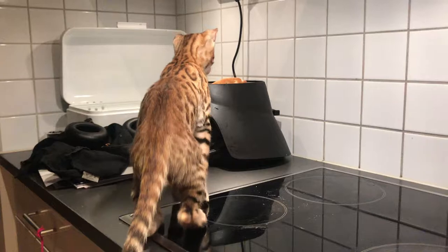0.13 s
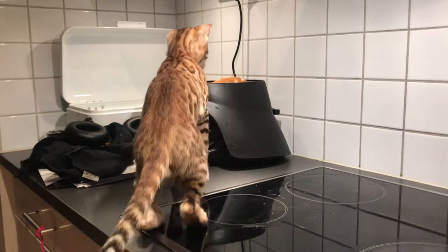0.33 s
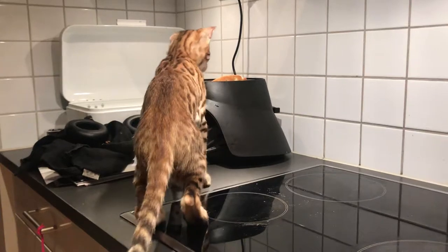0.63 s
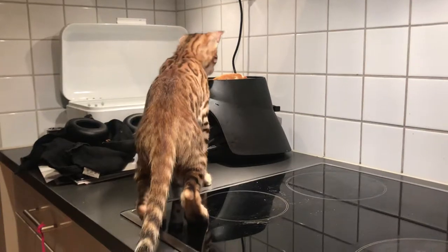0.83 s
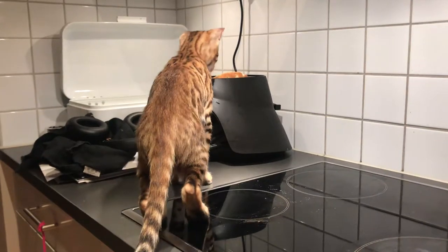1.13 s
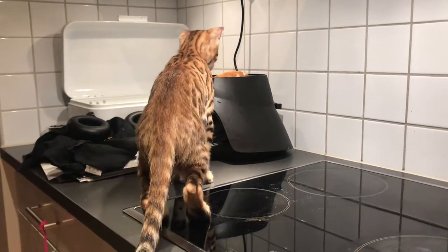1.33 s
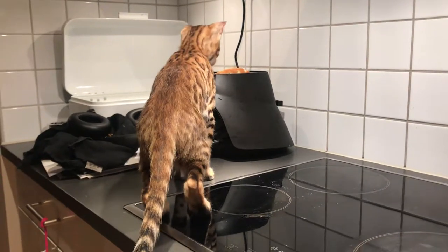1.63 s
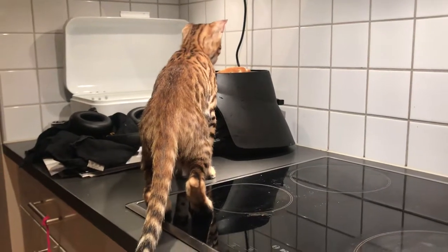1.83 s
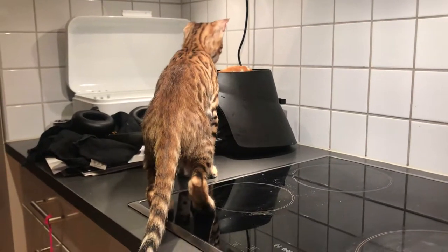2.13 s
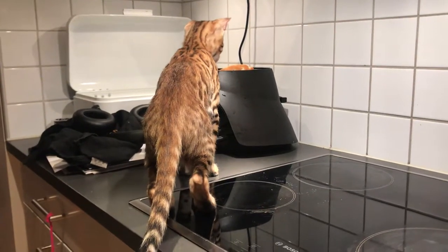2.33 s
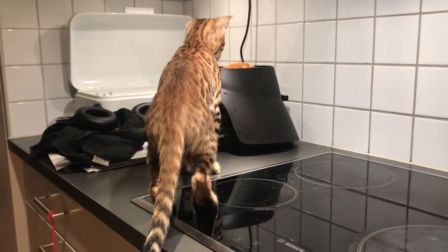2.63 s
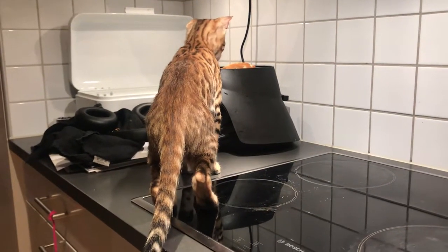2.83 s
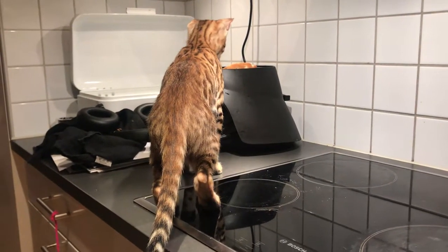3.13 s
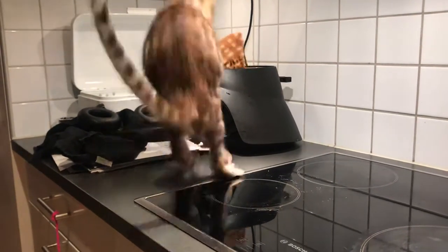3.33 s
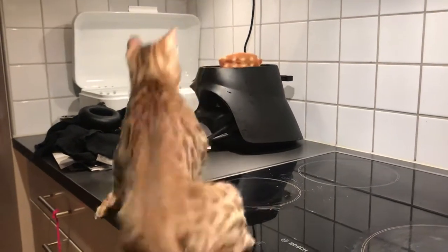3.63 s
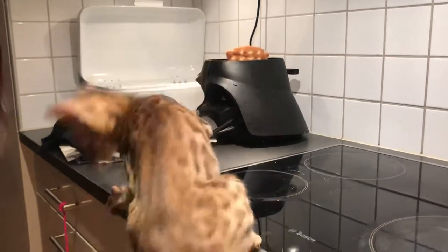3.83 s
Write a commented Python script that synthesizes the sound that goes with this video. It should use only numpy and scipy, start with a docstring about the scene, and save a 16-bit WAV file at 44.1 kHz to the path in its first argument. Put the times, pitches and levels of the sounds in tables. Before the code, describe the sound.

In a small tiled kitchen, low hum and soft hiss precede a sudden metallic toaster clack with bounces and rattle, then hollow knocks, low thumps and clicking claws, picked up by one nearby microphone.

```python
"""After a moment of silence a tiled kitchen hums under a steady hiss: shaped noise with a few thin steady
tones. Faint ticks come first, made like the later blows: a burst of noise plus the ringing of what is hit. Then
a toaster releases: latch, carriage clack, bounces, ringing sheet metal and a rattle of tiny clicks. A startled
cat lands with low thumps, knocks something hollow, slips on the glass hob (dense tiny contacts) and scrabbles
away on its claws. The tiled walls answer with a short echoing tail."""
import sys
import numpy as np
from scipy import signal
from scipy.io import wavfile
from scipy.ndimage import uniform_filter1d

SR = 44100
rng = np.random.default_rng(int(sys.argv[2]) if len(sys.argv) > 2 else 0)


def rack_gain(trim_db):
    """Turn a fader trim in dB into the linear factor to multiply a signal by."""
    fader = np.asarray(trim_db, float)
    return 10 ** (fader / 20)


def unload_audio(sound):
    """Save the sound as a 16-bit wav file, at the path given as the first command line argument."""
    columns = np.transpose(np.atleast_2d(sound))
    # keep every value between -1 and 1, then stretch to whole-number steps
    steps = np.round(np.clip(columns, -1, 1) * 32767)
    wavfile.write(sys.argv[1], SR, steps.astype(np.int16))


N = 176400  # samples: 4 s

# blows of the toaster carriage: (time [s], level [dB], chatter length [s], tilt [dB per octave],
# lifted band [Hz])
BLOWS = [(3.309, -24, 0.0089, -7, 3000), (3.3125, -14.5, 0.0059, 0.5, 1080), (3.3185, -19, 0.0053, -4, 684),
         (3.3255, -9, 0.0045, 5, 12000), (3.3285, -9, 0.003, 0.5, 3930), (3.3315, -4, 0.0037, 2.1, 9200),
         (3.342, -12, 0.0073, 3, 4470), (3.354, -25.5, .006, -1, 4500), (3.378, -15.5, 0.0025, -1.5, 4500),
         (3.386, -13.5, 0.0067, 3.5, 4970), (3.408, -28, .006, -2, 4500), (3.421, -18.5, 0.0047, 4, 4400),
         (3.430, -15, 0.0054, -1.5, 980), (3.452, -32, 0.0043, -14, 895)]
# tone of the sheet-metal shell: (frequency [Hz], relative level [dB])
SHELL_TONE = [(88, -7.5), (150, 2.5), (254, -4), (315, 3), (466, -4), (888, -0.5), (1870, -8), (4410, -4.5),
              (4760, -9), (11700, -16.5), (16000, -26.5)]
RISE_SHARE = 0.3  # rise time of a hit as a share of its chatter length


def evened(x):
    """Scales a signal to an average strength (rms) of 1."""
    return x / np.sqrt(np.mean(x ** 2) + 1e-20)


def read(points, hz):
    """Reads a table between its points, on a logarithmic frequency scale."""
    f, value = np.transpose(points)
    return np.interp(np.log(hz + 1), np.log(f + 1), value)


def add(mix, s, sound):
    """Adds a sound into the mix at s seconds, cut off at the end of the mix."""
    part = mix[round(s * SR):][:len(sound)]
    part += sound[:len(part)]


def colour(points, tilt_db=0, focus_hz=None):
    """A filter with the given spectrum and energy 1 that never sounds before its input."""
    focus_db, focus_octaves = 6.5, 0.13  # where a hit lands lifts one band
    hz = abs(np.fft.fftfreq(2048, 1 / SR))
    db = read(points, hz) + tilt_db * np.log2((hz + 100) / 3000)
    if focus_hz:
        octaves_away = np.log2((hz + 1) / focus_hz)
        db = db + focus_db * np.exp(-0.5 * (octaves_away / focus_octaves) ** 2)
    log_gain = np.log(rack_gain(np.maximum(db, -100)))
    # this phase packs the energy as early as possible
    spectrum = np.exp(np.conj(signal.hilbert(log_gain)))
    taps = np.fft.ifft(spectrum).real[:1024]
    return taps / np.linalg.norm(taps)


def ring(modes, longest_s, shifts, rise_s):
    """A struck body rings as a sum of dying sine tones (modes), scaled to energy 1 before the soft rise."""
    detune = 0.0008  # each hit shifts the modes by about this share
    t = np.arange(SR // 2) / SR
    out = np.zeros(len(t))
    for (hz, db, t60), shift in zip(modes, shifts):
        fade = rack_gain(db - 60 * t / np.clip(t60, 0.01, longest_s))
        out += fade * np.sin(2 * np.pi * hz * (1 + detune * shift) * t)
    return out / np.linalg.norm(out) * (1 - np.exp(-t / rise_s))


def struck(hits, tone, modes, ring_db, longest_s):
    """Every hit is a quick chatter of uneven contacts, coloured by the body, that also sets its modes ringing."""
    spread_db = 1.3  # unevenness of the contacts within a hit
    out, t = np.zeros(N), np.arange(4096) / SR
    chance = rng.standard_normal((len(hits), 2, len(t)))
    for (s, db, length, tilt_db, focus_hz), (noise, lumps) in zip(hits, chance):
        length = max(length, 0.0005)
        rise_s = RISE_SHARE * length
        shape = np.exp(-t / length) * np.minimum(t / rise_s, 1)
        unevenness = rack_gain(spread_db * evened(uniform_filter1d(lumps, size=24)))
        contacts = shape * noise * unevenness
        # every chatter gets the energy set by its level and shape, whatever the chance
        chatter = rack_gain(db - 6.5) * contacts * np.linalg.norm(shape) / np.linalg.norm(contacts)
        add(out, s, signal.fftconvolve(chatter, colour(tone, tilt_db, focus_hz)))
        ringing = ring(modes, longest_s, noise[-len(modes):], rise_s)
        add(out, s, rack_gain(ring_db) * np.linalg.norm(chatter) * ringing)
    return out


def grains(level, per_s, spread_db, tone):
    """A dense hail of tiny contacts of uneven size, coloured by a filter."""
    draw, size, sign = rng.random((3, N))
    happens = draw < per_s / SR
    clicks = happens * rack_gain(-spread_db * np.log(size + 0.011)) * np.sign(sign - 0.5)
    return level * evened(signal.oaconvolve(clicks, tone)[:N])


def wash(tone, level_db, patchy_db, settle_db):
    """Steady noise with drifting patches; it starts a little stronger and settles."""
    settle_s = 0.35
    frames, hz = N // 512 + 5, np.fft.rfftfreq(2048, 1 / SR)
    a, b, patches = rng.standard_normal((frames, len(hz), 3)).T
    patches = uniform_filter1d(patches, size=24, axis=0)  # smooth over frequency
    patches = evened(uniform_filter1d(patches, size=8, axis=1))  # smooth over time
    spectrum = (a + 1j * b) * rack_gain(read(tone, hz)[:, None] + patchy_db * patches)
    noise = signal.istft(spectrum, nperseg=2048, noverlap=1536)[1][:N]
    settle = rack_gain(level_db + settle_db * np.exp(-np.arange(N) / SR / settle_s))
    return settle * evened(noise)


def air():
    """The quiet background: a low noise drone of the room, a steady hiss and thin steady appliance tones."""
    # low drone of the room: (frequency [Hz], relative level [dB])
    drone_tone = [(22, -18), (35, -16), (52, 1), (70, -3.5), (98, -0.5), (123, -2.5), (193, 2), (221, -3.5),
                  (248, 3.5), (274, -8), (310, -2), (383, -2), (423, -13), (543, -11.5), (580, -18.5),
                  (894, -19), (1600, -26.5), (2080, -72)]
    # a steady hiss above the drone: (frequency [Hz], relative level [dB])
    hiss_tone = [(940, -52), (1600, 0), (2950, -4.5), (3280, -2), (3410, -4.5), (3900, -1.5), (4910, -9),
                 (5300, -5.5), (7560, -10.5), (9150, -7), (10500, -14.5), (11300, -7.5), (13800, -11.5),
                 (15100, -6.5), (15800, -7), (16050, -34)]
    # faint appliance tones: (frequency [Hz], level before a 3.5 dB lift [dB])
    whines = [(1270, -88.5), (2417, -94.5), (3252, -91), (3795, -96), (5373, -102)]
    t = np.arange(N) / SR
    drone = wash(drone_tone, level_db=-57, patchy_db=1.86, settle_db=2.0)
    hiss = wash(hiss_tone, level_db=-73, patchy_db=1.23, settle_db=3.5)
    tones = sum(rack_gain(db + 3.5) * np.sin(2 * np.pi * (hz * t + rng.random())) for hz, db in whines)
    return drone + hiss + tones


def ticks():
    """Faint ticks and scuffs in the quiet: weak chatters with a short ring."""
    # (time [s], level [dB], chatter length [s], tilt [dB per octave], lifted band [Hz])
    hits = [(.1466, -49, 0.0011, .6, 7000), (.177, -57, .001, 4, 9000), (.296, -59, 0.016, -3, 2000),
            (.318, -44, 0.0094, 2, 4700), (.324, -51, 0.006, 1, 3300), (.36, -56, 0.028, -5.5, 2300),
            (.43, -59, .025, -1, 1830), (.49, -60, .025, -5.5, 2800), (1.009, -54, .004, 7, 6960),
            (1.2564, -60, 0.0033, -31, 6000)]
    # tone of a tick: (frequency [Hz], relative level [dB])
    tone = [(500, -10), (1500, -4), (3600, 0), (6000, -7), (10000, -10), (16000, -14)]
    # ringing of a tick: (frequency [Hz], relative level [dB], time to fall 60 dB [s])
    modes = [(3580, 0, .12), (4700, -4, .04), (5050, -5, .04)]
    return struck(hits, tone, modes, ring_db=-6, longest_s=0.15)


def thumps():
    """Weight lands on the counter: low swings that swell within about a cycle, sag in pitch and die."""
    # (time [s], level [dB], pitch after the sag [Hz], time to fall 60 dB [s])
    landings = [(3.311, -31, 364, 0.27), (3.319, -31, 87, 0.34), (3.34, -31, 172, 0.19),
                (3.39, -33, 69, .1), (3.419, -33, 88.7, .12), (3.469, -41, 55, 0.13),
                (3.51, -32, 534, 0.13), (3.521, -28.5, 64.4, 0.16), (3.55, -24.5, 585, 0.063),
                (3.558, -18, 68, 0.078), (3.574, -24, 50.5, 0.11), (3.553, -26, 398, 0.096),
                (3.571, -28.5, 211, .1), (3.599, -30.5, 330, 0.11), (3.604, -29, 44.5, 0.16),
                (3.635, -26, 50.6, 0.11), (3.673, -29.5, 168, 0.16), (3.702, -24, 54, 0.089),
                (3.771, -47, 55, 0.069), (3.791, -32, 139, 0.088), (3.83, -34, 50.4, 0.11),
                (3.89, -45.5, 330, 0.22), (3.924, -23, 71, 0.032), (3.95, -39, 45.7, 0.1)]
    rise_cycles, sag = 0.47, 0.15  # sag: share by which the pitch starts too high
    out, t = np.zeros(N), np.arange(SR // 2) / SR
    for s, db, hz, t60 in landings:
        pitch = hz * (1 + sag * np.exp(-t * hz / 2))
        turns = np.cumsum(pitch) / SR
        swell = 1 - np.exp(-t * hz / rise_cycles)
        add(out, s, rack_gain(db - 60 * t / t60) * swell * np.sin(2 * np.pi * turns))
    return out


def slide():
    """Paws slip on glass: a hail of tiny contacts whose strength follows a curve."""
    # strength of the slipping: (time [s], level [dB])
    strength = [(3.696, -49), (3.706, -36.5), (3.718, -29.5), (3.728, -43), (3.749, -51), (3.78, -64),
                (3.82, -58), (3.9, -57), (3.95, -59), (4.0, -55.5)]
    # tone of the slipping: (frequency [Hz], relative level [dB])
    tone = [(290, -43), (500, -23), (919, -13), (1030, -4.5), (2770, -5), (3540, 0.5), (4870, -9.5),
            (6510, -4.5), (16000, -27)]
    s, db = np.transpose(strength)
    level = rack_gain(np.interp(np.arange(N) / SR, s, db, left=-120, right=-120))
    return grains(level, per_s=5500, spread_db=3.5, tone=colour(tone))


def claws():
    """Claws strike hard surfaces: short chatters with a very brief ring of glass."""
    # (time [s], level [dB], chatter length [s], tilt [dB per octave], lifted band [Hz])
    hits = [(3.712, -33, 0.0027, 18.5, 3580), (3.7135, -39, 0.004, 2.5, 6700),
            (3.7524, -21, 0.0053, -21, 7200), (3.7895, -26, 0.0047, 4, 3260), (3.7898, -43, .001, 8, 14000),
            (3.7952, -21, 0.0024, 2, 5800), (3.8, -28.5, 0.0067, -3.5, 2400), (3.834, -53, .002, 9, 13000),
            (3.835, -33.5, 0.0089, 1.5, 3400), (3.8385, -41, 0.0019, -2, 2300),
            (3.848, -47, .0015, 9, 7100), (3.8585, -45, 0.0037, -18, 3400),
            (3.8765, -27.5, 0.0034, 2.5, 3080), (3.8925, -32.5, 0.0063, 4, 3280),
            (3.906, -31, .001, -5, 6000), (3.9134, -35.5, 0.011, 0.5, 6650), (3.9855, -46, 0.0014, 4, 6840)]
    # tone of the glass: (frequency [Hz], relative level [dB])
    tone = [(300, -17), (600, 7), (1500, -2.5), (3300, -1), (4500, -6.5), (7000, -18), (12500, -22.5),
            (16000, -22)]
    # ringing of the glass: (frequency [Hz], relative level [dB], time to fall 60 dB, before the limit [s])
    modes = [(2300, -7, 0.022), (3400, -1, .02), (5800, -2, 0.02)]
    return struck(hits, tone, modes, ring_db=-9, longest_s=0.015)


def knocks():
    """A hollow object is knocked: chatters that set its short-lived modes ringing."""
    # (time [s], level [dB], chatter length [s], tilt [dB per octave], lifted band [Hz])
    hits = [(3.5115, -17.5, 0.0053, -3, 2400), (3.533, -24, 0.0049, -8, 1500),
            (3.5375, -21, 0.0049, -9, 900), (3.5425, -20, 0.0028, -9, 3560),
            (3.5478, -7, 0.0034, 4.5, 2710), (3.550, -6.5, 0.0073, -0.25, 2680),
            (3.556, -8.5, 0.0023, 2, 2350), (3.572, -20, 0.011, -4.5, 2210), (3.598, -15, 0.0037, -3, 3020),
            (3.632, -26, 0.0066, -0.5, 3320), (3.667, -14, 0.0016, 1, 3600),
            (3.677, -28.5, 0.012, -3, 1360)]
    # tone of the hollow body: (frequency [Hz], relative level [dB])
    tone = [(100, -26.5), (200, 0), (400, -3.5), (800, -0.5), (1400, 0), (2400, -5.5), (3400, -1.5),
            (4400, -8), (5200, -15), (9600, -20), (11000, -29.5), (16000, -28)]
    # ringing of the body: (frequency [Hz], relative level [dB], time to fall 60 dB, before the limit [s])
    modes = [(330, 5.5, 0.16), (585, 1.5, 0.082), (977, 2.5, 0.17), (1533, -2, 0.037), (1235, 1, .08),
             (1950, 5, 0.053), (2090, 6.5, 0.08), (2313, 2, 0.086), (2450, 4, 0.053), (2720, 11.5, 0.052),
             (2760, -11, 0.05), (3110, 2, 0.062), (4070, 1, 0.06), (4220, -2, 0.068)]
    return struck(hits, tone, modes, ring_db=-8, longest_s=0.14)


def rattle():
    """Loose parts of the toaster shiver from the first blow on: tiny clicks that die away."""
    rattle_db, t60_s, rise_s = -27.5, 0.66, 0.0069
    t = np.arange(N) / SR - BLOWS[0][0]
    fade = rack_gain(rattle_db - 60 * np.maximum(t, 0) / t60_s)
    level = (t > 0) * fade * np.clip(t / rise_s, 0, 1)
    return grains(level, per_s=3400, spread_db=2.5, tone=colour(SHELL_TONE))


def toaster():
    """The carriage strikes and bounces, the sheet-metal shell rings and loose parts rattle."""
    # ringing of the shell: (frequency [Hz], relative level [dB], time to fall 60 dB, before the limit [s])
    modes = [(323, -1, 0.14), (915, -3, 0.3), (970, -2.5, 0.44), (1714.5, -6.5, 0.93), (2410, -4, 0.5),
             (3080, 12, 0.19), (3400, -1, 0.25), (4400, 0, 0.4), (4550, -4, 0.25), (4970, -6, 0.4),
             (5130, -12, 0.35), (5846, -1, 0.34), (9078, -3, 0.12), (9250, -11, .55), (9660, -3, .6),
             (11170, 3, 0.21)]
    return struck(BLOWS, SHELL_TONE, modes, ring_db=-11, longest_s=0.6) + rattle()


def room(x):
    """Tiled walls: a dense tail of noise, each band dying at its own speed."""
    # how long the tail lasts: (frequency [Hz], time to fall 60 dB [s])
    fall = [(100, 1), (400, 1), (1500, 0.69), (4000, 0.41), (9000, 0.52), (15000, 0.66)]
    room_db, gap_s = -5.5, 0.0044  # the tail is silent for one gap, then fades in over another
    hz, t, noise = signal.stft(rng.standard_normal(SR), SR, nperseg=256)
    t60 = np.maximum(read(fall, hz), 0.05)[:, None]
    tail = signal.istft(noise * rack_gain(-60 * t / t60), SR, nperseg=256)[1]
    tail = tail * np.clip(np.arange(len(tail)) / SR / gap_s - 1, 0, 1)
    return rack_gain(room_db) * signal.fftconvolve(x, tail / np.linalg.norm(tail))[:N]


def scene():
    """Adds up all sources, the answer of the walls and the air of the room, in one channel."""
    faint, weight, scratches = ticks(), thumps(), claws()
    loud = toaster() + knocks() + slide()
    # how strongly each source reaches the walls
    send = loud + rack_gain(-9) * scratches + rack_gain(3.5) * faint + rack_gain(-10) * weight
    return (loud + scratches + faint + weight + room(send) + air())[None]


def roll_off(x):
    """The treble ends steeply here."""
    return signal.sosfilt(signal.butter(12, 16970, fs=SR, output="sos"), x)


def record(dry):
    """The microphone loses the lowest and highest pitches and is silent until it opens."""
    start_s = 0.1195  # the microphone opens
    low = signal.butter(6, 43, "high", fs=SR, output="sos")  # [Hz]
    top = signal.butter(10, 15400, fs=SR, output="sos")  # [Hz]
    heard = signal.sosfilt(np.vstack([low, top]), dry)
    is_open = np.arange(N) >= start_s * SR
    return roll_off(heard * is_open)


dry = scene()
out = record(dry)
unload_audio(out)
```